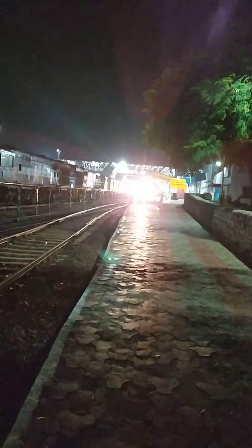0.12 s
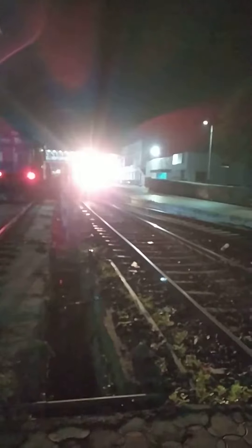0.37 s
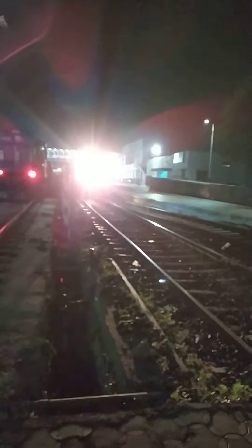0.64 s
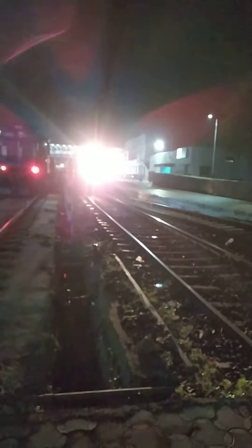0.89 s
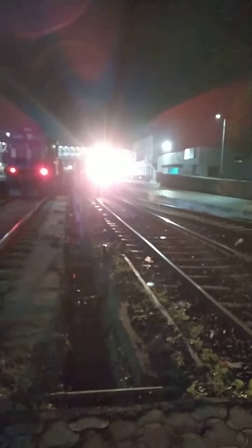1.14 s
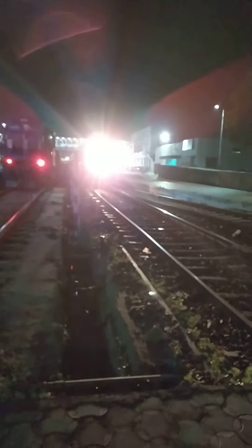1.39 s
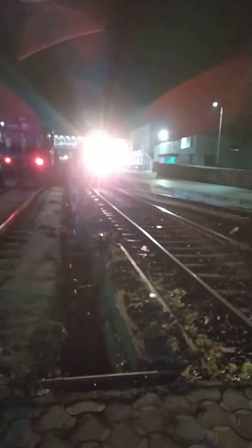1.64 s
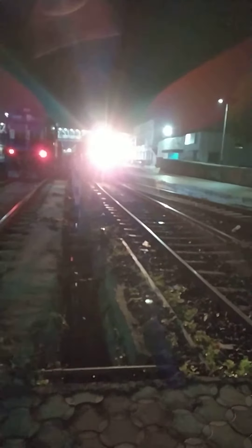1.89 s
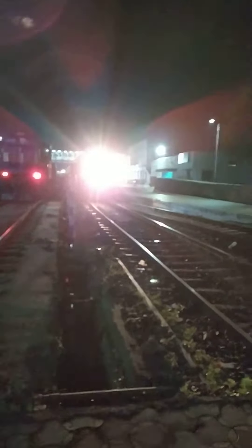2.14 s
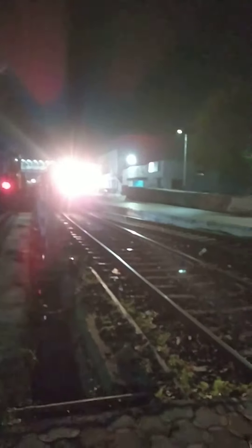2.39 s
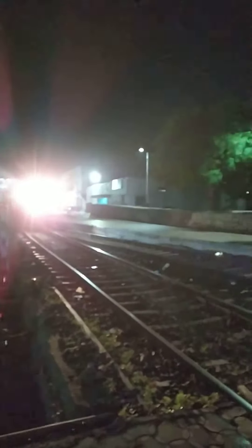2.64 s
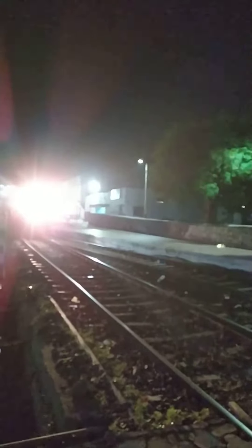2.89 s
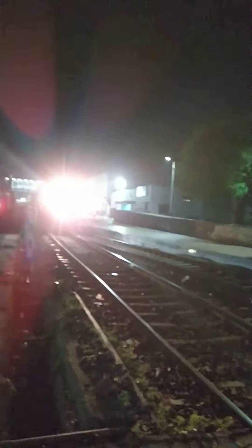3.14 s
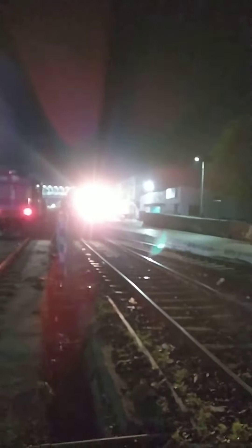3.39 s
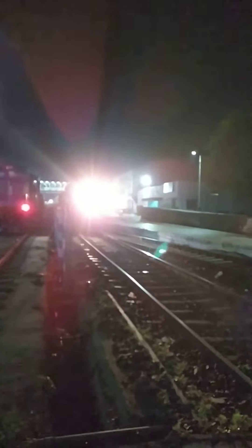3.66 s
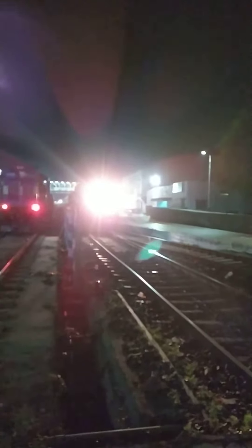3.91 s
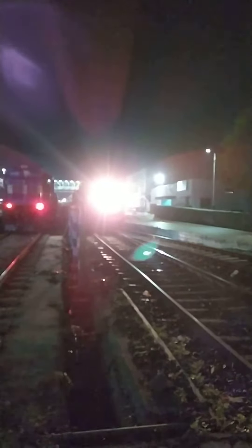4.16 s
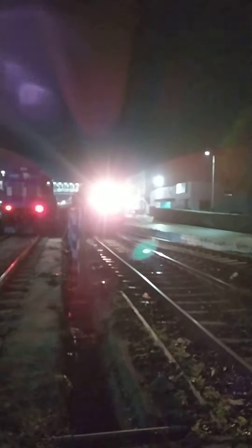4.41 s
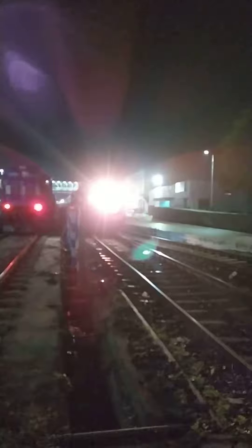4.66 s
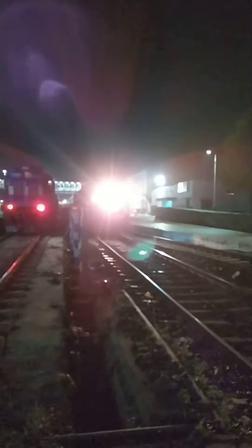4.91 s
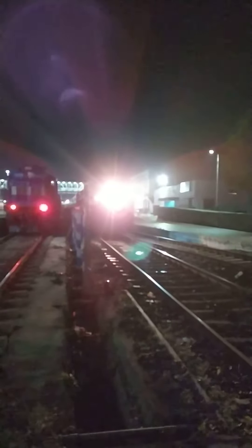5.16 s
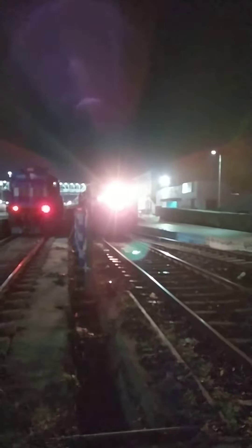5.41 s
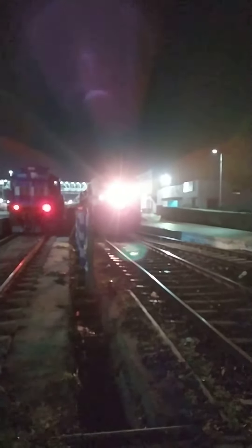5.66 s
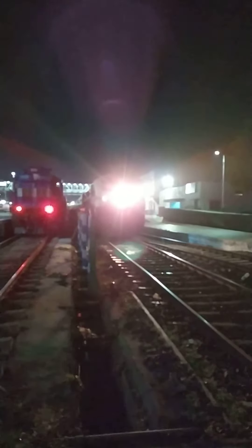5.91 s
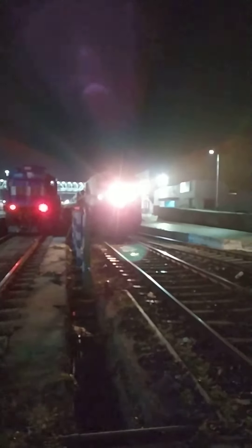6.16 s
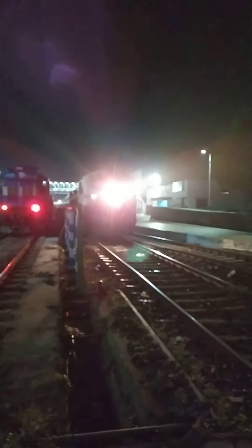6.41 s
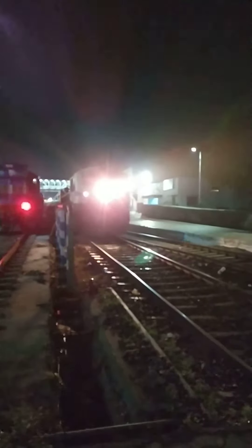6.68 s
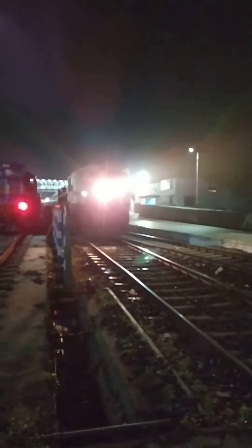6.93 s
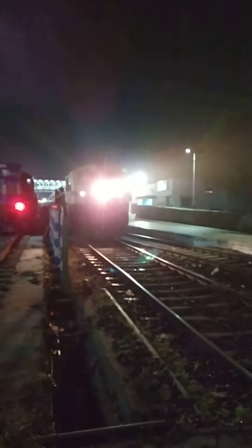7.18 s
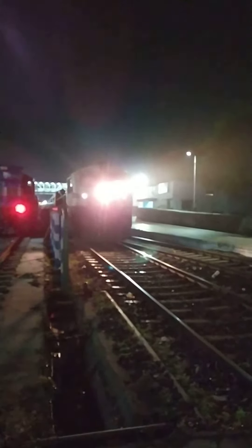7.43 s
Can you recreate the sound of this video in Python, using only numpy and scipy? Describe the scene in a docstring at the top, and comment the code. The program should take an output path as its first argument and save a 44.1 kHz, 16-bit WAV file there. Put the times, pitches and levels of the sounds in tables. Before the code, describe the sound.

A night railway station in open air, captured in stereo by a handheld phone. From 0 to 0.2 s, engine rumble and airy roar are joined by about seven crisp, ringing insect ticks, evenly spaced and stronger on the right, with a cricket near 4 kHz. Around 0.2 s the position changes in a quick crossfade. From then on, three big diesels idle at slightly different speeds, making a dense throbbing drone around 50 to 110 Hz that beats and swells. Fans, exhaust and escaping air form a continuous rough hiss, its colour shifting until about 2.3 s as the listener turns. Faint wandering whines and quick valve clatter sit inside. Crickets near 3.5 and 5.4 kHz chirp irregularly over faint trills, the higher slowly strengthening. A low growl near 250 Hz rises steadily as one engine approaches, strongest at 7.5 s. No horn or sudden air blast.

```python
"""A station at night: three big diesel engines idle at slightly different speeds, so that their harmonics beat.
Fans, exhaust and escaping air add a roar of filtered noise, and crickets beside the track are rough tones. For
the first fifth of a second another scene sounds, where an insect ticks as ringing scrapes; then the scene
changes and the listener turns slowly; two microphone ports of a phone hear it all with small lags and level
differences."""
import sys
import numpy as np
from scipy import signal
from scipy.fft import rfft, irfft
from scipy.io import wavfile
from scipy.ndimage import uniform_filter1d, map_coordinates

SR = 44100
rng = np.random.default_rng(int(sys.argv[2]) if len(sys.argv) > 2 else 0)


def to_wav(s):
    """Save 16-bit WAV."""
    ch = np.atleast_2d(s).T  # columns
    pcm = np.round(np.clip(ch, -1, 1) * 32767)  # PCM
    wavfile.write(sys.argv[1], SR, pcm.astype(np.int16))


def undo_db(level):
    """Turn decibels back into plain size, where 20 dB means ten times bigger."""
    steps = np.asarray(level, float) / 20
    return 10 ** steps


N = 332955
TIME = np.arange(N) / SR

# idling of the parked engine: cycle rate/Hz, crank angle/turns, exhaust dispersion/turns,
# level waver/dB, speed waver/turns of the cycle
PARKED_CYCLE = (6.3975, .232, .076, 1.2, .0015)
GROWTH_REFERENCE_S = 6  # steadily growing sounds have their tabled level at this time
SIDES = np.array([[.5], [-.5]])  # splits a left-minus-right level between the ports


def level(x, db):
    """Root-mean-square normalisation: scale to an rms level in dB."""
    return x * undo_db(db) / np.sqrt(np.mean(x ** 2))


def curve(table):
    """Linear interpolation in time: each column of a time table, one value a sample."""
    s, *columns = np.transpose(table)
    return [np.interp(TIME, s, c) for c in columns]


def over_hz(table):
    """Interpolation over log frequency: a (f/Hz, value) table read at every frequency bin."""
    hz, value = np.transpose(table)
    return np.interp(np.log(np.fft.rfftfreq(N, 1 / SR) + 1), np.log(hz), value)


def colour(x, gain):
    """Linear filtering: multiply the spectrum by a gain for each frequency bin."""
    return irfft(rfft(x) * gain, N)


def peak(hz, width):
    """Simple resonance: complex gain of 1 at its centre, falling by 3 dB half a width away."""
    f = np.fft.rfftfreq(N, 1 / SR)
    return 1 / (1 + 2j * (f - hz) / width)


def walk(rate):
    """Low-pass random process: smooth chance of spread 1 that turns about rate times a second."""
    step = 64
    k = max(int(SR / step / rate), 1)
    coarse = rng.standard_normal(N // step + 2)
    coarse = uniform_filter1d(uniform_filter1d(coarse, k), k)
    return np.interp(np.arange(N), np.arange(len(coarse)) * step, coarse / coarse.std())


def delay(x, lag):
    """Propagation delay: read lag samples late, with cubic interpolation."""
    return map_coordinates(x, [np.arange(N) - lag], order=3, mode="nearest")


def roar(switched):
    """Partial coherence: air noise has a part both ports share, late at the left, and a diffuse part."""
    # spectral density of the roar in each scene and facing: f/Hz, relative level/dB
    first_shape = [(76, -19), (130, 5.5), (153, -15), (210, -12.5), (284, -20), (340, -19.5), (458, -23.5),
                   (497, -19.5), (619, -20), (741, -21), (3260, -38.5), (4220, -40), (5260, -41.5),
                   (7700, -39), (15500, -49)]
    platform_shape = [(100, -48), (170, -2.5), (413, -10.5), (518, -12), (548, -12), (637, -11.5),
                      (1020, -11), (1460, -14), (1670, -29), (1870, -14), (2350, -27.5), (3360, -25),
                      (4630, -30), (7280, -25.5), (15500, -36)]
    track_shape = [(100, -9), (170, 2), (260, -7), (348, -12.5), (421, -6), (518, -11), (675, -9.5),
                   (1730, -17.5), (1940, -20.5), (3300, -24.5), (3550, -24), (4060, -27.5), (5380, -25.5),
                   (5810, -27.5), (10800, -27.5), (15500, -35.5)]
    # rms level/dB in the first scene, facing the platform, facing down the track
    view_db = -27.5, -30, -32.5
    # level difference of the ports: f/Hz, left minus right/dB
    lean_platform = [(60, 0.5), (110, -1), (200, -0.5), (380, 5), (700, -3.5), (1290, 8.5), (2380, -5.5),
                     (4400, -0.5), (8120, 1.5), (15000, -3)]
    lean_track = [(60, 0.5), (110, 2), (200, 0), (380, 2), (700, -2.5), (1290, 0), (2380, -5.5),
                  (4400, -2.5), (8120, -1), (15000, -8)]
    # turning of the listener: t/s, share facing the track (0-1), lag of the left port/samples
    turning = [(0, .01, 4), (.3, .54, 5.2), (1.4, .5, 5.6), (2.3, 1, 3.2), (3, .96, 1.9), (7.55, 1, 1.6)]
    # power share of the sound common to both ports: f/Hz, share (0-1)
    likeness = [(60, .999), (150, .995), (250, .94), (550, .9), (1200, .74), (1800, .66), (2500, .28),
                (7500, .3), (11000, .25), (13500, .3)]
    # edges of the ranges that flutter apart: f/Hz
    flutter_edges = 0, 2000, 4000, 7000, 11000, 23000
    # range that bends further round the phone: low f/Hz, high f/Hz, factor on the lag
    detour = 1200, 2200, 2.1
    # hiss resonances of vents and housings: f/Hz, width/Hz, added gain as a factor
    vents = [(6180, 135, 1), (7440, 370, 0.95), (8150, 540, 0.3), (10450, 270, 0.19), (12500, 180, 0.17),
             (14200, 150, 0.17)]
    # the approaching engine lifts the roar: t/s, relative level/dB
    approach = [(0.0, 2.15), (7.55, 3)]
    flutter_db = 1.5

    facing, lag = curve(turning)
    f = np.fft.rfftfreq(N, 1 / SR)
    alike = over_hz(likeness)
    shared = colour(rng.standard_normal(N), np.sqrt(alike))
    spectrum = rfft(colour(rng.standard_normal((2, N)), np.sqrt(1 - alike)))
    diffuse = 0
    for low, high in zip(flutter_edges, flutter_edges[1:]):
        flutter = undo_db(flutter_db * np.array([walk(39), walk(14.4)]))  # left, right
        diffuse = diffuse + irfft(spectrum * ((f >= low) & (f < high)), N) * flutter

    bend_low_hz, bend_high_hz, bend_factor = detour
    bent = colour(shared, (f >= bend_low_hz) & (f < bend_high_hz))
    left = delay(shared - bent, lag) + delay(bent, bend_factor * lag)
    ports = np.array([left, shared]) + diffuse
    hiss = 1 + sum(lift * np.abs(peak(hz, width)) ** 2 for hz, width, lift in vents)
    ports = undo_db(curve(approach)[0]) * colour(ports, hiss)

    below = over_hz([(90, -21), (150, -9.5)])  # the bass belongs to the rumble
    views = zip((first_shape, platform_shape, track_shape), (lean_platform, lean_platform, lean_track),
                view_db, (1 - switched, switched * (1 - facing), switched * facing))
    out = 0
    for shape, lean, db, share in views:
        view = colour(ports, undo_db(over_hz(shape) + below + SIDES * over_hz(lean)))
        out = out + share * level(view, db)
    return out


def song(chirps, trill_db, throb_db):
    """Amplitude modulation: level in dB of chirps over a faint trill, all throbbing."""
    rise_s, sag_db_per_s, fall_s, throb_hz = 0.0075, 7, 0.012, 17.4
    power = undo_db(2 * trill_db) + np.zeros(N)
    for s, length, db in chirps:
        since = TIME - s
        rise = np.clip(since / rise_s + .5, 0, 1)
        fall = np.clip((length - since) / fall_s + .5, 0, 1)
        sagging_db = db - sag_db_per_s * np.clip(since - length / 2, -1, 1)
        power += (rise * fall) ** 2 * undo_db(2 * sagging_db)
    return 10 * np.log10(power) + throb_db * walk(throb_hz)


def cricket(song_db, pitch, rough, spread_hz, lean_db, db, wide_db):
    """Narrow-band modulation: a wing rasp near one pitch, with a wide part in antiphase between the ports."""
    wobble_hz, wobble_rate_hz = 9, 40  # quick unsteadiness of the pitch
    phase = 2 * np.pi * np.cumsum(curve(pitch)[0] + wobble_hz * walk(wobble_rate_hz)) / SR
    # steady carrier plus random sidebands; the wide part has less of the carrier
    sway = [steady + rough * (walk(spread_hz) + 1j * walk(spread_hz)) for steady in (1, .3)]
    middle, wide = (level(np.real(s * np.exp(1j * phase)), 0) for s in sway)
    middle *= undo_db(song_db + db)
    wide *= undo_db(uniform_filter1d(song_db, SR // 4) + wide_db)
    return undo_db(SIDES * lean_db) * np.array([middle + wide, middle - wide])


def crickets():
    """Superposition of insect songs: one in the first scene gives way to a low and a high one."""
    # chirps of the low, the high and the first cricket: start t/s, length/s, relative level/dB
    chirps_low = [(0.255, 0.033, -52), (0.35, 0.029, -48), (0.57, 0.045, -50), (0.696, 0.041, -51),
                  (0.772, 0.029, -49), (0.806, 0.036, -51), (0.905, 0.035, -49), (1.011, 0.043, -54),
                  (1.19, 0.063, -53), (1.46, 0.057, -49), (1.523, 0.065, -48), (1.71, 0.037, -51),
                  (2.059, 0.031, -56), (2.242, 0.034, -52), (2.328, 0.092, -48.5), (2.436, 0.13, -47.5),
                  (2.598, 0.061, -53), (2.679, 0.033, -58), (2.748, 0.059, -47.5), (2.818, 0.083, -51),
                  (2.99, 0.12, -49), (3.17, 0.059, -49), (3.243, 0.068, -48.5), (3.633, 0.061, -51),
                  (3.709, 0.065, -54), (3.778, 0.085, -48), (3.875, 0.044, -49), (4.1, 0.031, -52),
                  (4.138, 0.077, -47.5), (4.258, 0.069, -49), (4.334, 0.059, -49), (4.44, 0.069, -46.5),
                  (4.533, 0.03, -56), (4.743, 0.057, -48), (4.817, 0.043, -52), (4.926, 0.036, -50),
                  (5.048, 0.039, -56), (5.178, 0.15, -47), (5.381, 0.031, -55), (5.451, 0.039, -54),
                  (5.505, 0.059, -52), (5.581, 0.082, -49), (5.669, 0.031, -55), (5.864, 0.17, -51.5),
                  (6.044, 0.053, -48), (6.124, 0.23, -48.5), (6.375, 0.045, -53), (6.475, 0.033, -56),
                  (6.575, 0.029, -48), (6.72, 0.093, -51), (6.812, 0.099, -49), (6.976, 0.061, -50),
                  (7.13, 0.11, -46.5), (7.373, 0.089, -49)]
    chirps_high = [(.19, .07, -53), (.73, 0.073, -53), (2.02, 0.25, -51), (3.1, 0.066, -51),
                   (3.33, 0.076, -54), (3.8, .2, -55), (4.32, .06, -52), (4.7, .08, -54), (4.9, 0.08, -46),
                   (5.42, 0.076, -47), (5.9, 0.11, -47), (6.2, 0.062, -55), (6.42, 0.08, -48),
                   (7.12, 0.16, -52), (7.42, .13, -52)]
    chirps_first = [(.035, 0.059, -53), (.11, 0.077, -52)]
    # mean pitch of each: t/s, f/Hz
    pitch_low = [(.25, 3475), (.7, 3468), (1.6, 3478), (2.2, 3478), (2.8, 3484), (3.4, 3490), (3.7, 3466),
                 (4.3, 3456), (4.9, 3464), (5.2, 3477), (6.1, 3485), (7, 3494), (7.55, 3484)]
    pitch_high = [(.25, 5385), (1.3, 5398), (2.2, 5412), (3.1, 5412), (3.7, 5405), (4.3, 5378), (4.9, 5388),
                  (5.2, 5408), (6.4, 5425), (7.55, 5428)]
    pitch_first = [(0, 4160), (.2, 4150)]
    high_grow_db_per_s = 0.43  # the high cricket comes closer
    change_s, fade_s = .187, .015  # the insects change over at their own earlier, shorter fade

    low = cricket(song(chirps_low, trill_db=-55, throb_db=1), pitch_low,
                  rough=.2, spread_hz=35, lean_db=-3, db=.3, wide_db=.8)
    high_db = song(chirps_high, trill_db=-51, throb_db=.3)
    high_db = high_db + high_grow_db_per_s * (TIME - GROWTH_REFERENCE_S)
    high = cricket(high_db, pitch_high, rough=.75, spread_hz=140, lean_db=-0.46, db=-1.7, wide_db=-1.8)
    first = cricket(song(chirps_first, trill_db=-76, throb_db=0), pitch_first,
                    rough=.3, spread_hz=50, lean_db=-1.2, db=1.5, wide_db=-5)
    changed = np.clip((TIME - change_s) / fade_s + .5, 0, 1)
    return changed * (low + high) + (1 - changed) * first


def ticks():
    """Impulse excitation: short dry scrapes ring a small insect body and come back once from a wall."""
    # ticks in the first scene: t/s, relative level/dB
    tick_table = [(0.0164, -32), (0.043, -31), (0.0702, -35), (0.0967, -32), (0.1233, -26.5), (0.1501, -38),
                  (0.177, -31.5)]
    # resonances of the body: f/Hz, width/Hz, relative level/dB
    modes = [(7740, 1500, 5), (8520, 920, 2), (10500, 2700, -7)]
    decay_s, echo_s, echo_db = 0.0018, 0.0067, -17
    scrapes = np.zeros(N)
    scrape = np.exp(-np.arange(200) / SR / decay_s)
    for (s, db), grit in zip(tick_table, rng.standard_normal((len(tick_table), 200))):
        grit = grit / grit[:40].std()
        for late_s, loss_db in ((0, 0), (echo_s, echo_db)):
            i = int((s + late_s) * SR)
            scrapes[i:i + 200] += undo_db(db + loss_db) * scrape * grit
    ring = colour(scrapes, sum(undo_db(db) * peak(hz, width) ** 2 for hz, width, db in modes))
    return np.array([delay(ring, 12.1), undo_db(5.5) * ring]) * undo_db(5)  # late and weaker at the left


def whines():
    """Frequency modulation: fan and gear tones wander; each stands to one side, so the left port is late."""
    # tones: mean f/Hz, wander/Hz, rms level/dB, waver/dB, lag of the left port/samples
    tones = [(410, 15, -50.5, 2, 4), (554.3, 1.2, -50.5, 2, 12), (679, 7, -48, 2, 2),
             (2980, 30, -60.5, 1, 3)]
    out = 0
    for hz, wander_hz, db, waver_db, lag in tones:
        phase = 2 * np.pi * np.cumsum(hz + wander_hz * walk(4 * wander_hz)) / SR
        tone = level(np.cos(phase) * undo_db(waver_db * walk(1.4)), db)
        out = out + np.array([delay(tone, lag), tone])
    return out


def clatter():
    """Fourier series: valve and rod knocks repeat every shaft turn, a line at each multiple of its rate."""
    # mean level of the lines: f/Hz, rms level/dB
    line_levels = [(200, -64), (400, -62), (800, -66), (1400, -70), (2000, -75), (2600, -81), (4000, -92)]
    # the loudest lines: multiple of the shaft rate, rms level/dB
    loud_lines = [(24, -54), (29, -57), (32, -55), (64, -59), (68, -59), (87, -61), (108, -63), (111, -64),
                  (114, -66), (117, -66), (132, -66), (141, -67), (159, -70), (161, -70), (162, -68),
                  (180, -72)]
    waver_db, lag = 2, 3  # the left port is late by lag samples
    shaft_hz, size = 2 * PARKED_CYCLE[0], 4096  # two shaft turns a cycle; samples in one turn
    hz, db = np.transpose(line_levels)
    multiples = np.arange(size // 2 + 1)
    chance = rng.standard_normal((2, size // 2 + 1))
    lines = undo_db(np.interp(np.log(shaft_hz * multiples + 1), np.log(hz), db, -200, -200))
    lines = lines * (chance[0] + 1j * chance[1]) / np.sqrt(2)
    for k, line_db in loud_lines:
        lines[k] *= undo_db(line_db) / np.abs(lines[k])
    turn = irfft(lines, size) * size / np.sqrt(2)
    knocks = map_coordinates(turn, [shaft_hz * TIME % 1 * size], mode="grid-wrap")
    knocks = knocks * undo_db(waver_db * walk(2.5))
    return np.array([delay(knocks, lag), knocks])


def near_swell(k):
    """Slow modulation of one order's level/dB: echoes shift the loudest, some grow, upper ones waver."""
    # the loudest orders swell and sink as the echoes shift: t/s, level change/dB
    echo_swell = [(.2, -2), (1.6, 3.5), (2.2, 2.5), (3.3, 2.5), (4.4, 1.5), (5.3, 1), (6.3, -6.5), (7.2, 1),
                  (7.55, -1.5)]
    # the seventeenth order swells and sinks several times, strongest near 1 s: t/s, level change/dB
    seventeenth_swell = [(.2, 3), (1.15, 7.5), (2.1, -5.5), (3.1, 3.5), (3.7, -8), (4.6, 3), (6.2, -4),
                         (7.55, 3.5)]
    # twice the firing tone sinks, then swells at the end: t/s, level change/dB
    double_swell = [(.2, 2), (2.6, 1), (3.4, -3), (5.6, -1), (6.2, 3), (7.55, 7)]
    # the firing tone fills out midway and sags at the end: t/s, level change/dB
    firing_swell = [(.2, 1), (2.8, -1), (3.8, 2.5), (5, 0), (6.5, 2), (7.55, -2)]
    grow_db_per_s, upper_waver_db = 0.73, 2
    if k in (14, 15):
        return curve(echo_swell)[0]
    if k == 17:
        return curve(seventeenth_swell)[0]
    if k == 16:
        return curve(double_swell)[0]
    if k == 8:
        return curve(firing_swell)[0]
    if k in (9, 13):
        return grow_db_per_s * (TIME - GROWTH_REFERENCE_S)
    return upper_waver_db * walk(0.58) if k >= 16 else np.zeros(N)


def engine(orders, cycle, swell=lambda k: np.zeros(N), lead=0):
    """Harmonic series: uneven cylinders sound multiples of the cycle; the exhaust spreads their timing."""
    coarse = 16  # bass needs few samples
    lumpy_db, lumpy_hz = .6, 14  # cycle-to-cycle unevenness of the firing
    hz, crank, dispersion, waver_db, speed_waver = cycle
    turns = (hz * TIME + crank + lead + speed_waver * walk(0.57))[::coarse]
    bass = 0
    for k, db in orders:
        change_db = swell(k) + waver_db * walk(2.2) + lumpy_db * walk(lumpy_hz)
        phase = 2 * np.pi * (k * turns + dispersion * k ** 2)
        bass = bass + np.sqrt(2) * undo_db(db + change_db[::coarse]) * np.cos(phase)
    return signal.resample_poly(bass, coarse, 1)[:N]


def engines(switched):
    """Beating of harmonic series: three engines, with rumble, hums, growl, clatter and whines."""
    # engine orders: multiple of the four-stroke cycle rate, mean rms level/dB before any swell
    near_orders = [(6, -49.4), (7, -44.5), (8, -25.6), (9, -33.9), (10, -45), (11, -43.1), (12, -42),
                   (13, -29.7), (14, -40.5), (15, -23.7), (16, -36), (17, -33), (18, -47.5), (19, -46.1),
                   (22, -51.2), (23, -52.1), (24, -49.9), (25, -45.4), (48, -58.3), (30, -52)]
    parked_orders = [(6, -46.2), (8, -48), (11, -44.9), (12, -35.0), (13, -49), (14, -38.1), (18, -30.5),
                     (20, -42.0), (22, -52.4), (23, -49.9), (24, -45.7), (25, -47.2), (26, -46.3),
                     (32, -52.4), (36, -54.2), (46, -58.2), (16, -42)]
    coming_orders = [(6, -54), (7, -55), (8, -39), (9, -38.5), (10, -45), (13, -48), (14, -46), (15, -45),
                     (16, -50), (17, -49), (18, -51), (19, -51), (20, -51), (31, -52), (46, -55), (50, -59)]
    # idling of the near and the approaching engine, columns as in PARKED_CYCLE
    near_cycle = (6.1342, .216, .131, 1.2, .0015)
    coming_cycle = (6.68, .07, .017, 2.5, .006)
    # the near engine's governor hunts slowly: t/s, crank lead/turns of the cycle
    near_hunt = [(0, .004), (.6, .004), (1.6, -.011), (3.7, .01), (5.2, -.034), (5.9, -.036), (7.55, .008)]
    # the parked engine gains a little late on: t/s, crank lead/turns of the cycle
    parked_hunt = [(0, 0), (4.6, .001), (5.6, .008), (7.55, .008)]
    # engine tones in the first scene: f/Hz, rms level/dB
    first_tones = [(48.4, -29.5), (80.7, -30.5), (113.0, -36), (123.8, -30), (629.8, -44.5), (866.7, -55),
                   (888.2, -54)]
    # steady hums; the mains hum beats once a second with the near firing: f/Hz, rms level/dB, phase/turns
    hums = [(50.09, -34, -.49), (56.6, -43, 0), (63.37, -39, .26)]
    # exhaust growl of the approaching engine: f/Hz, width/Hz, level at the end/dB, rise/(dB per s)
    growl_settings = 251, 140, -37, 3
    # spectral density of the rumble of uneven firing: f/Hz, relative level/dB
    rumble_shape = [(25, -40), (34, -34), (44, -14), (52, 3), (70, 27), (100, 22.5), (125, 24.5),
                    (170, -27)]
    rumble_db = -37
    bass_lag, bass_lean_db = 5.1, 0.48  # samples, dB; the bass reaches the right port first

    near = engine(near_orders, near_cycle, near_swell, uniform_filter1d(curve(near_hunt)[0], SR // 2))
    parked = engine(parked_orders, PARKED_CYCLE, lead=curve(parked_hunt)[0])
    later = near + parked + engine(coming_orders, coming_cycle)
    for hz, db, turns in hums:
        later += np.sqrt(2) * undo_db(db) * np.cos(2 * np.pi * (hz * TIME + turns))

    growl_hz, width_hz, growl_db, rise_db = growl_settings
    growl = colour(rng.standard_normal(N), peak(growl_hz, width_hz) ** 2)
    later += level(growl, growl_db) * undo_db(rise_db * (TIME - TIME[-1]))

    first = 0
    for hz, db in first_tones:
        first = first + np.sqrt(2) * undo_db(db) * np.cos(2 * np.pi * (hz * TIME + rng.random()))
    rumble = level(colour(rng.standard_normal(N), undo_db(over_hz(rumble_shape))), rumble_db)
    mono = np.sqrt(1 - switched) * first + np.sqrt(switched) * later + rumble
    bass = undo_db(SIDES * bass_lean_db) * np.array([delay(mono, bass_lag), mono])
    return bass + np.sqrt(switched) * (whines() + clatter())


def scene():
    """Linear superposition of all sources, in the first scene and in the scene that follows it."""
    switch_s, fade_s = 0.212, 0.085
    switched = np.clip((TIME - switch_s) / fade_s + .5, 0, 1)
    return roar(switched) + crickets() + ticks() + engines(switched)


def top_cut(x):
    """Nothing passes above the cut-off."""
    return signal.sosfilt(signal.butter(12, 15725, fs=SR, output="sos"), x)


def record(dry):
    """First-order high-pass response: each port cuts the deepest bass at its own corner and dulls the top."""
    # corner of the left and the right port: f/Hz
    port_cut = 2.4, 6.9
    # treble response of both ports: f/Hz, gain/dB
    port_top = [(9000, 0.07), (11000, -1.5), (12000, -8), (13600, -2.5), (14300, -9), (15300, -6),
                (15700, -7)]
    ports = [signal.lfilter(*signal.butter(1, hz, "high", fs=SR), x) for x, hz in zip(dry, port_cut)]
    mix = colour(np.array(ports), undo_db(over_hz(port_top)))
    return top_cut(mix)


dry = scene()
out = record(dry)
to_wav(out)
```